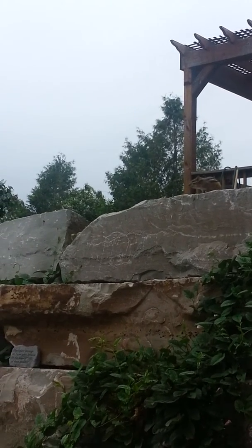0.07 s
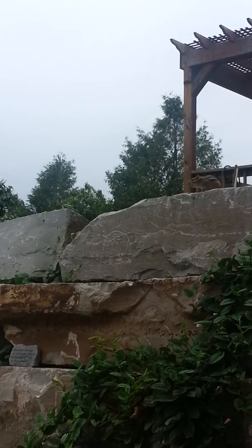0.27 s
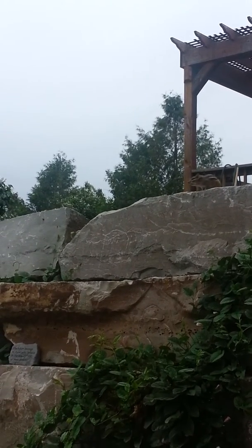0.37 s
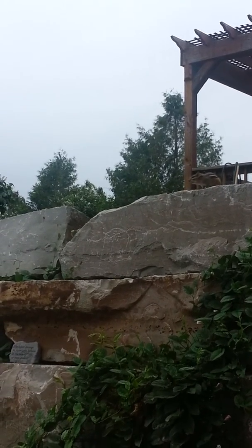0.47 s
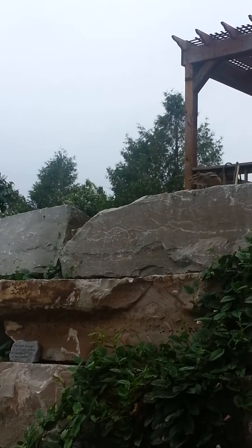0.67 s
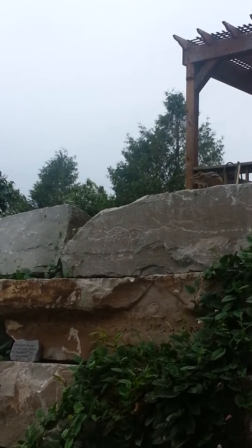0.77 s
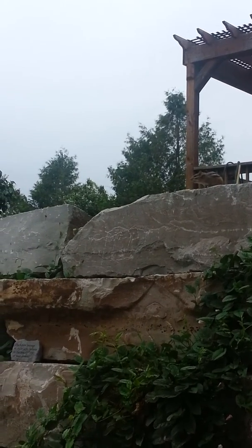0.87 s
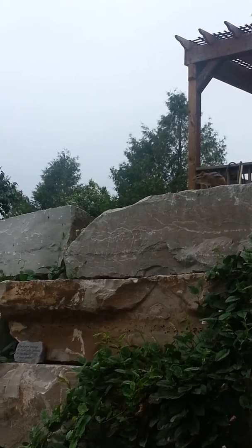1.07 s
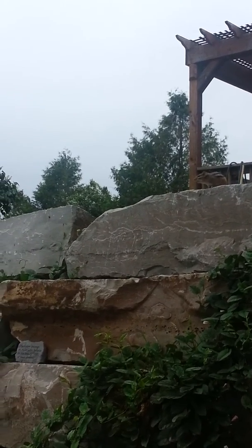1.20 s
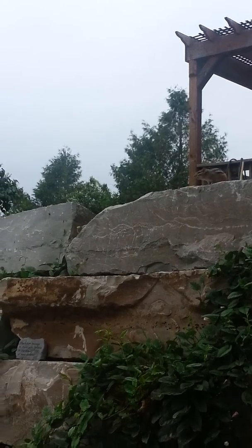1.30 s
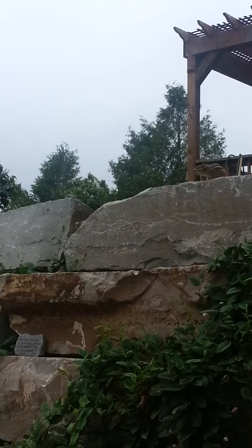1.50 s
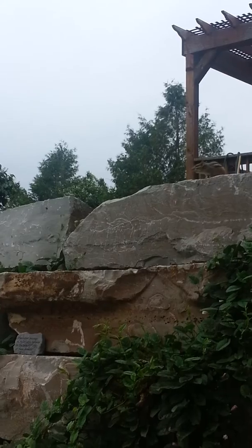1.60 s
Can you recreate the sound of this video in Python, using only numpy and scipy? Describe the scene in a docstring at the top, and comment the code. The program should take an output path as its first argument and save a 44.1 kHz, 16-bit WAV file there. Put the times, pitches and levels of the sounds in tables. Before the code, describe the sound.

In a quiet garden, a chipmunk close to the microphone's left chips four times, loud and very high, with slight distortion on the peaks. A soft rustle and faint bird peeps follow the second chip, over distant rumble and insect hiss.

```python
"""Far rumble and insect hiss come first; then a chipmunk chips four times from a wall, close on the left.
Each chip is a thin held whistle that swells and plunges an octave, ending on one soft falling low note;
a faint ghost tone, mostly on the left, comes just before that note. Rocks and trees answer with echoes.
The loudest peaks overload the left channel, with a dull thump as the first chip peaks.
A rustle follows the second chip, a far bird peeps faintly, and a low drone swells near the end."""
import sys
import numpy as np
from scipy import signal
from scipy.fft import rfft, irfft, next_fast_len
from scipy.io import wavfile
from scipy.ndimage import uniform_filter1d, map_coordinates

SR = 44100
rng = np.random.default_rng(int(sys.argv[2]) if len(sys.argv) > 2 else 0)


def pcm_store(signal):
    """Save signal as 16-bit PCM."""
    levels = np.round(np.clip(np.atleast_2d(signal), -1, 1) * 32767)
    wavfile.write(sys.argv[1], SR, levels.astype(np.int16).T)


N = 72765


def amp(db):
    """Turn decibels into a number to multiply by."""
    return 10 ** (np.asarray(db) / 20)


def along(points, hz):
    """Read a curve of (frequency, value) points at hz, on a log frequency scale."""
    f, value = np.transpose(points)
    return np.interp(np.log(hz + 1), np.log(f + 1), value)


def filtered(x, response):
    """Scale and shift each frequency in x by response(hz)."""
    n = x.shape[-1]
    padded = next_fast_len(n + SR // 10)
    return irfft(rfft(x, padded) * response(np.fft.rfftfreq(padded, 1 / SR)), padded)[..., :n]


def wobble(rate):
    """A smooth curve through `rate` random values a second."""
    return map_coordinates(rng.standard_normal(N // 10), [np.arange(N) * rate / SR])


def place(x, start):
    """Set a short sound into silence, `start` seconds in."""
    return np.pad(x, (max(round(start * SR), 0), N))[:N]


def glide(start_hz, end_hz, length):
    """A sliding tone that fades in and out."""
    progress = np.linspace(0, 1, int(length * SR))
    hz = start_hz + (end_hz - start_hz) * progress
    return np.sin(np.pi * progress) * np.sin(2 * np.pi * np.cumsum(hz) / SR)


# How alike left and right are: f/Hz, likeness (1 = the same)
STEREO_LIKENESS = [(50, .55), (250, 0.57), (1000, 0.11), (4000, .1)]
def stereo_noise(colour):
    """Noise of strength 1, more alike on both sides in the bass; colour is its level by frequency."""
    def split(hz):
        angle = np.arccos(np.clip(along(STEREO_LIKENESS, hz), -1, 1)) / 2
        return amp(along(colour, hz)) * [np.cos(angle), np.sin(angle)]
    shared, opposite = filtered(rng.standard_normal((2, N)), split)
    noise = np.array([shared + opposite, shared - opposite])
    return noise / np.sqrt(np.mean(noise ** 2) + 1e-20)


# Colour of the rumble: f/Hz, level/dB
RUMBLE_COLOUR = [(25, -19), (45, -17.5), (70, -8.5), (140, -4), (200, -6.5), (270, -2), (420, -8.5),
                 (770, -11.5), (1200, -15), (1700, -17), (3000, -18), (3900, -19), (6600, -84)]
def far_rumble(level_db=-56, sway_db=1):
    """Low, distant noise that wavers gently."""
    return amp(level_db + sway_db * wobble(8.62)) * stereo_noise(RUMBLE_COLOUR)


# Colour of the insect hiss: f/Hz, level/dB
INSECT_COLOUR = [(2500, -23), (3500, -8), (4600, -3), (5300, -8.5), (6200, -14), (9000, -13.5),
                 (14000, -15.5), (15000, -33.5)]
def insects(level_db=-61, sway_db=1):
    """Insects blend into a high hiss that flickers slightly."""
    return amp(level_db + sway_db * wobble(42)) * stereo_noise(INSECT_COLOUR)


# Pitch along a chip: share of its length, share of its starting pitch
CHIP_PITCH = [(0, 1), (.2, 0.97), (.35, 0.97), (.49, .84), (.59, .708), (.68, .582), (.81, .472),
              (.9, 0.3988), (1, 0.41)]
# Loudness along a chip: share of its length, level/dB
CHIP_LOUDNESS = [(0, -21.5), (.1, -13), (.24, -18.5), (.35, -7), (.5, -12), (.68, -7), (.8, -5.5),
                 (.88, -24), (1, -22)]
# How the throat colours overtones and hiss: f/Hz, level/dB
THROAT_COLOUR = [(2900, -24), (3400, -2.5), (8000, 6), (9600, 3.5), (11500, -2.5), (13600, 2), (14600, -8),
                 (15500, -27)]
def chip(top_hz, held_db, length, jitter=0.0051, overtone_db=-16.5, hiss_db=-19.5):
    """A held whistle that swells and plunges; overtones and hiss come in with the plunge."""
    held_share, fade_in_s, fade_out_s = 0.4, 0.00033, 0.0023
    t = np.arange(int(length * SR)) / SR
    progress = t / length
    pitch = np.interp(progress, *np.transpose(CHIP_PITCH))
    hz = top_hz * uniform_filter1d(pitch, size=120, mode="nearest")  # round off the corners
    phase = 2 * np.pi * np.cumsum(hz * (1 + jitter * wobble(900)[:len(t)])) / SR
    held = np.clip((held_share - progress) * 10, 0, 1)
    level = amp(np.interp(progress, *np.transpose(CHIP_LOUDNESS)) + held_db * held)
    fades = np.clip(t / fade_in_s, 0, 1) * np.clip((length - t) / fade_out_s, 0, 1)
    overtones = sum(amp(overtone_db) * np.sin(k * phase) * (k * hz < SR / 2) for k in (2, 3))
    hiss = amp(hiss_db) * rng.standard_normal(N)[:len(t)]
    rasp = filtered(overtones + hiss, lambda f: amp(along(THROAT_COLOUR, f)))
    plunging = np.clip(10 * (1 - hz / top_hz), 0, 1)
    return level * fades * (np.sin(phase) + plunging * rasp)


# The four chips: t/s, level/dB, starting f/Hz, extra level/dB of the held part, length/s
CHIP_CALLS = [(0.1936, 1, 8832, -4.5, 0.04), (0.5858, 0.44, 8730, -4, .041), (0.9707, 0.07, 8770, -3, .04),
              (1.3314, 0.02, 8657, 0, 0.042)]
def chipmunk(low_echo_db=0.5):
    """Every chip and its low note, along with the ghost tone and the echoes."""
    chips = sum(amp(db) * place(chip(top_hz, held_db, length), start)
                for start, db, top_hz, held_db, length in CHIP_CALLS)
    low = sum(ghost_and_low_note(start) for start, *_ in CHIP_CALLS)
    return rock_bounces(chips) + low + garden_echoes(chips + amp(low_echo_db) * low[0])


# Bounces reaching the left and the right microphone: delay t/s, level/dB
LEFT_BOUNCES = [(.000972, -8), (.001179, -15), (.001762, -6), (.001921, -12), (.002357, -13)]
RIGHT_BOUNCES = [(.000411, -6), (.001498, -13), (.001679, -8), (.002078, -11), (.003456, -17)]
def rock_bounces(x, right_db=-9, right_lead_s=0.000028):
    """The direct sound plus its bounces off the nearest rock faces, quieter on the right."""
    def paths(hz, bounces):
        return 1 + sum(amp(db) * np.exp(-2j * np.pi * hz * delay) for delay, db in bounces)
    left = filtered(x, lambda hz: paths(hz, LEFT_BOUNCES))
    right = filtered(x, lambda hz: np.exp(2j * np.pi * hz * right_lead_s) * paths(hz, RIGHT_BOUNCES))
    return np.array([left, amp(right_db) * right])


# Echoes scattered by rocks, garden and trees:
# delay t/s, rise t/s, t/s to fade by 60 dB, left level/dB, right level/dB, share of leaf colour
ECHOES = [(.004, 0.00044, 0.11, -6.5, -12, .1), (.012, 0.0055, 0.37, -17, -21, .5),
          (0.048, .002, 0.11, -19, -27.5, 0.65), (0.037, 0.035, 0.66, -34.5, -34, 1),
          (.195, .012, 0.2, -39.5, -50, 0.43)]
# How leaves colour the far echoes: f/Hz, level/dB
LEAF_COLOUR = [(1000, -0.5), (3300, 6), (4000, -4), (4700, 4.5), (5600, -8.5), (7000, -11.5), (8200, -7),
               (8700, 5), (10000, -6), (14000, -14.5)]
def garden_echoes(x):
    """Blurred echoes, each rising and dying at its own speed; far ones take the colour of the leaves."""
    t = np.arange(SR) / SR
    leaf_db = along(LEAF_COLOUR, np.fft.rfftfreq(SR, 1 / SR))
    spectrum = 0
    for delay, rise, fade, left_db, right_db, leaf_share in ECHOES:
        age = np.maximum(t - delay, 0)
        shape = (1 - np.exp(-age / rise)) * np.exp(-np.log(1000) * age / fade)
        shape /= np.linalg.norm(shape)
        echo = amp([[left_db], [right_db]]) * shape * rng.standard_normal((2, SR))
        spectrum += rfft(echo) * amp(leaf_share * leaf_db)
    return signal.fftconvolve(x[None], irfft(spectrum, SR), axes=1)[:, :N]


# The ghost tone, then the low note: t/s after the chip starts, level/dB, extra level/dB on the right
GHOST_AND_NOTE = [(.022, -42, -10.5), (0.0392, -34, -4.5)]
def ghost_and_low_note(chip_start, spread_db=0.3, right_lag_s=0.00011):
    """A faint ghost tone (not the animal's voice), mostly on the left, then one soft falling low note."""
    sound = np.zeros((2, N))
    for delay, db, right_db in GHOST_AND_NOTE:
        start = chip_start + delay
        tone = amp(db + spread_db * rng.standard_normal()) * glide(1352, 896, length=0.013)
        sound += [place(tone, start), amp(right_db) * place(tone, start + right_lag_s)]
    return sound


def overload_thump(start=0.2205, level_db=-24.5, hz=517):
    """A dull overload thump in the left channel as the first chip peaks."""
    left = amp(level_db) * place(glide(hz, hz, length=0.0028), start)
    return np.array([left, np.zeros(N)])


def swell(loudness, colour):
    """Noise of one colour that swells and fades."""
    level_db = np.interp(np.arange(N) / SR, *np.transpose(loudness))
    return amp(level_db) * stereo_noise(colour)


# Loudness of the rustle: t/s, level/dB
RUSTLE_LOUDNESS = [(.6, -91), (.65, -52), (.72, -53), (.82, -72), (.9, -92)]
# Its colour: f/Hz, level/dB
RUSTLE_TONE = [(100, -21.5), (400, -3), (800, -3.5), (2500, -6), (4000, -21), (12000, -49)]
def rustle():
    """A soft puff of noise after the second chip."""
    return swell(RUSTLE_LOUDNESS, RUSTLE_TONE)


# The bird's peeps: t/s, starting f/Hz, level/dB
BIRD_PEEPS = [(.71, 3350, -52), (0.827, 3400, -57.5), (0.954, 3500, -52.5), (1.19, 3400, -64.5)]
def far_bird(rise_hz=782, length=0.041, echo_db=12):
    """Faint rising peeps, blurred by the garden's echoes."""
    peeps = sum(amp(db) * place(glide(hz, hz + rise_hz, length), start) for start, hz, db in BIRD_PEEPS)
    return peeps + amp(echo_db) * garden_echoes(peeps)


# Loudness of the drone: t/s, level/dB
DRONE_LOUDNESS = [(0, -76), (1.15, -72.5), (1.35, -61), (1.501, -57), (1.65, -66)]
# Its colour: f/Hz, level/dB
DRONE_TONE = [(60, -45), (115, -9), (155, -4.5), (200, -16), (350, -33), (1000, -95)]
def drone():
    """A distant band of low noise that swells near the end."""
    return swell(DRONE_LOUDNESS, DRONE_TONE)


def scene():
    """The chipmunk and the overload thump, over the quiet garden sounds."""
    return chipmunk() + overload_thump() + far_bird() + far_rumble() + insects() + drone() + rustle()


# How strongly the microphone picks up each frequency: f/Hz, level/dB
MIC_COLOUR = [(100, 0.5), (13800, 0), (14800, 0), (15600, -21.5)]
def record(dry, top_hz=15650):
    """Overload flattens the loudest peaks a little unevenly; the highest treble is cut off."""
    clipped = np.clip(dry, -0.99, 0.95)
    return filtered(clipped, lambda hz: amp(along(MIC_COLOUR, hz)) * (hz < top_hz))


dry = scene()
out = record(dry)
pcm_store(out)
```